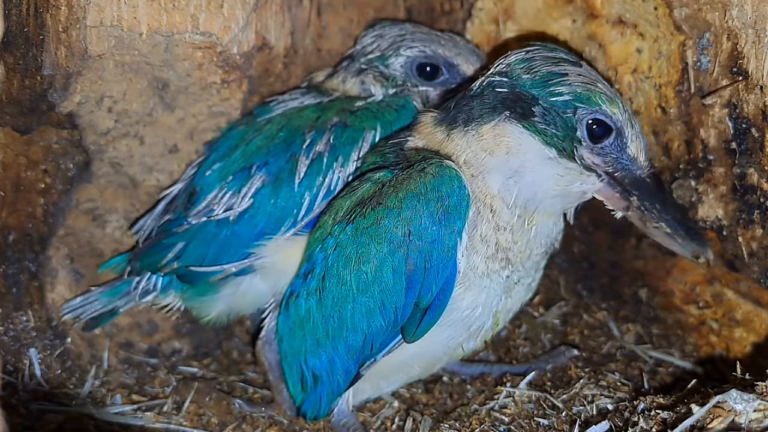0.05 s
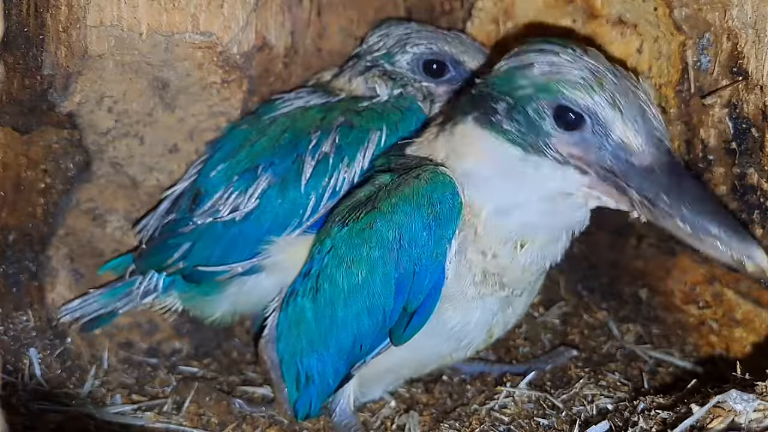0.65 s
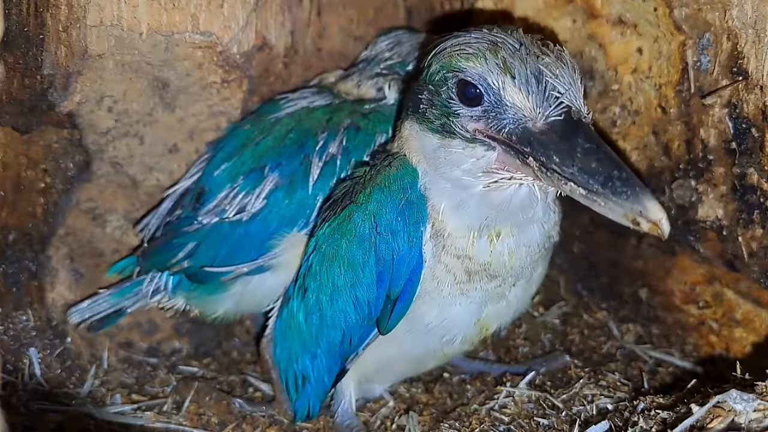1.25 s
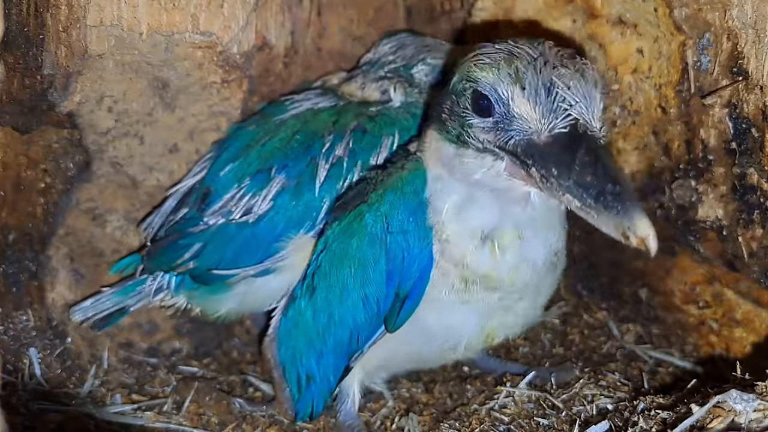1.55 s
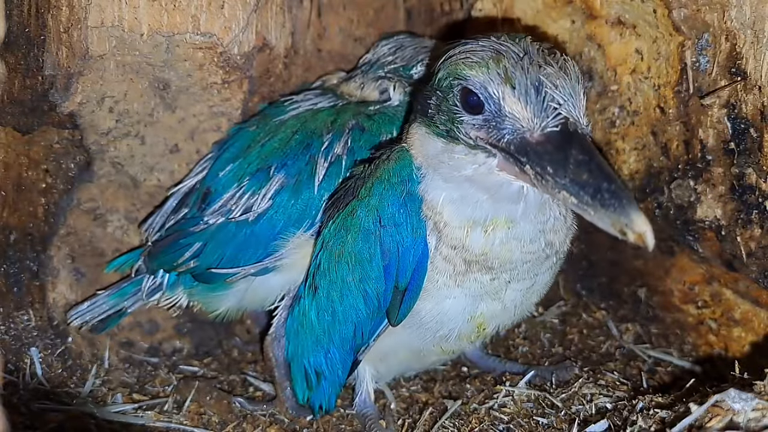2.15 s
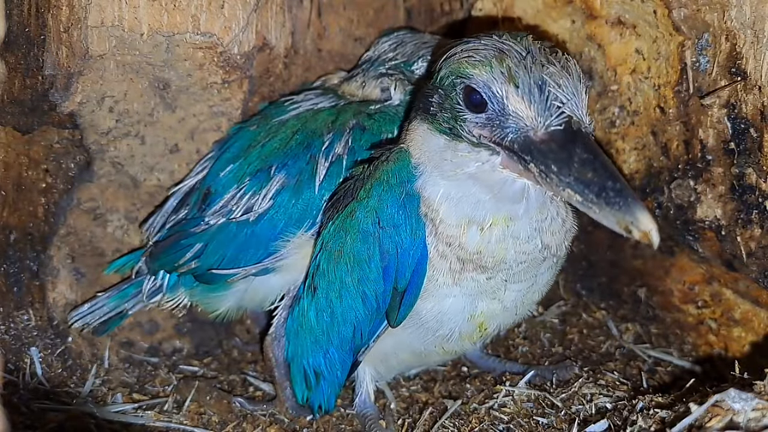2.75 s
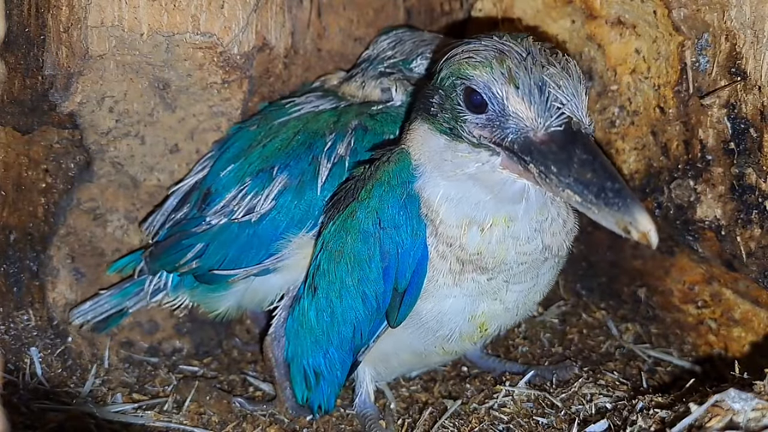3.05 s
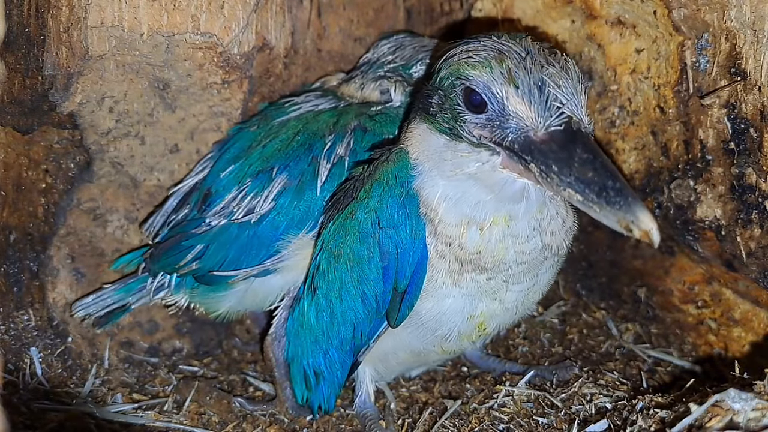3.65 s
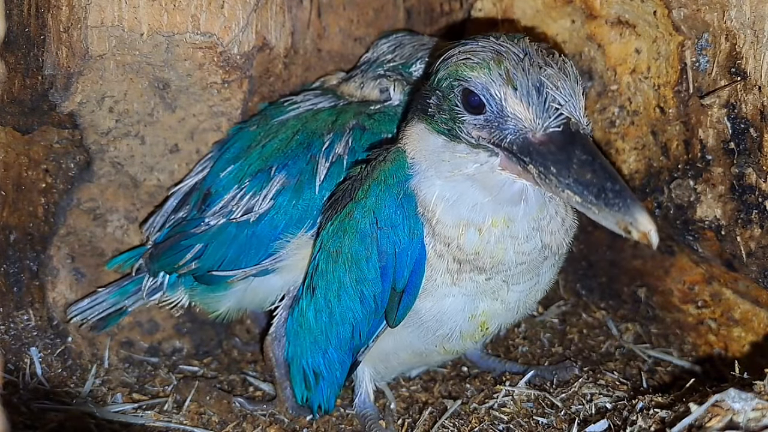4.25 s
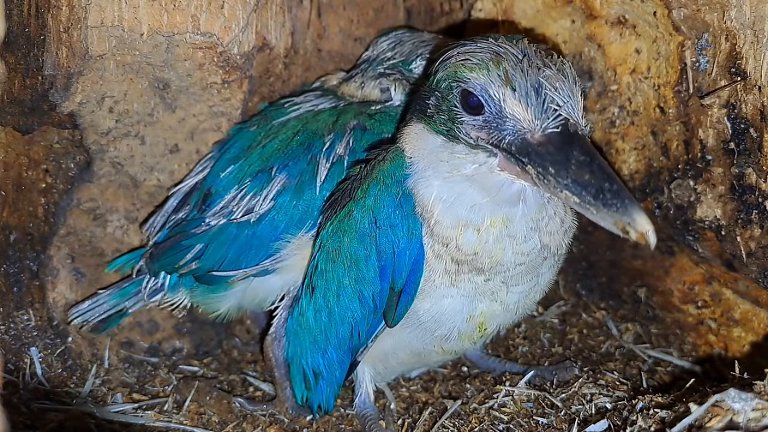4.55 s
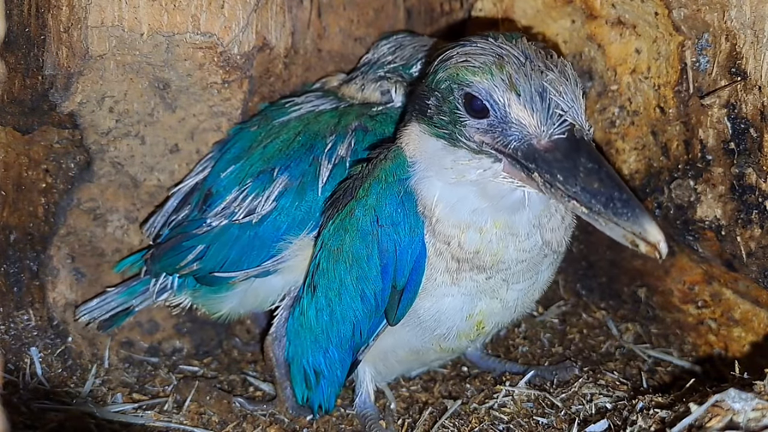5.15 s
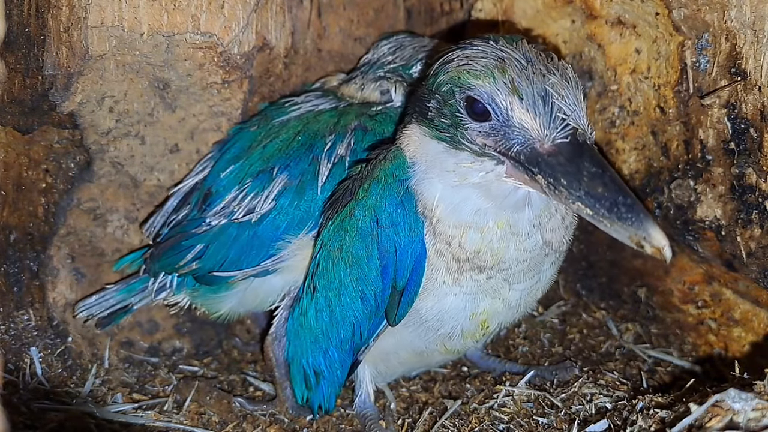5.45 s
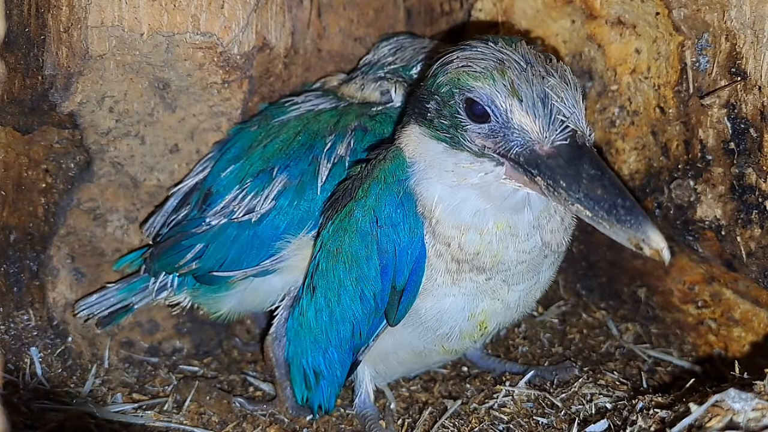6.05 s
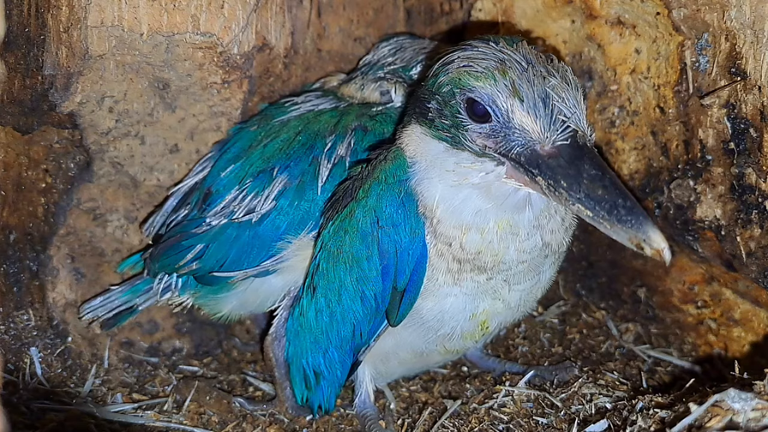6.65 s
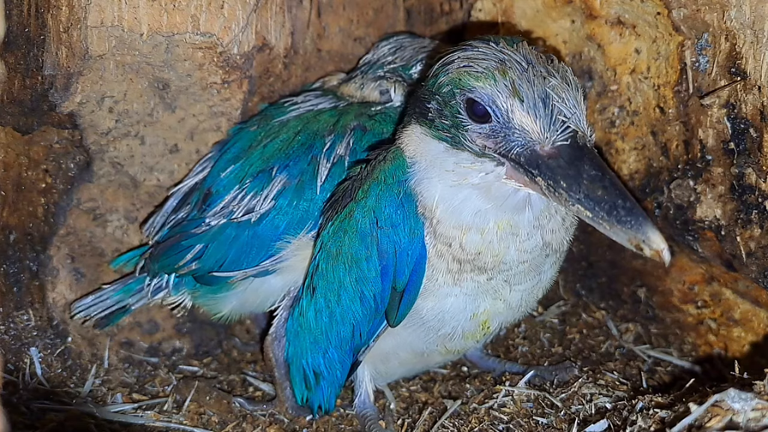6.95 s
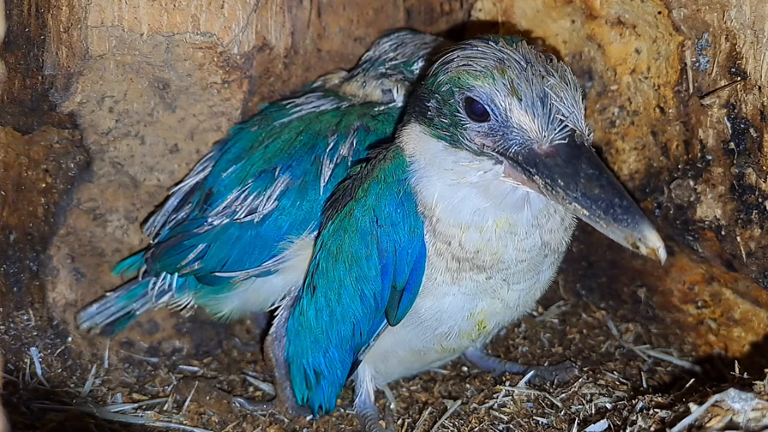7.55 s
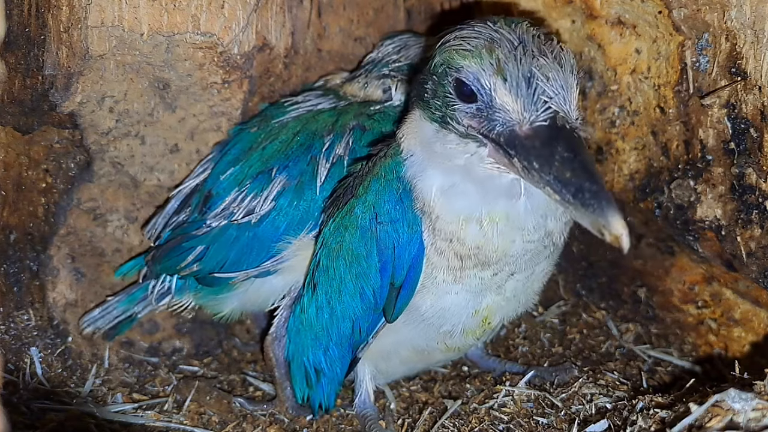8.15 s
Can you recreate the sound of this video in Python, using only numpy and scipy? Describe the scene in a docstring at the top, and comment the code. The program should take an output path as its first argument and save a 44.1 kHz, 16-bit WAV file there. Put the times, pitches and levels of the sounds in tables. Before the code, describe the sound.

A kingfisher chick begs up close in harsh, rasping screeches and rapid chips, over a low hum and faint distant birds.

```python
"""Kingfisher chicks begging in a nest hollow

Two chicks sit in a wooden hollow; the near one begs in harsh rasps. Its voice is one whistle near
1.7 kHz, modulated by the fluttering syrinx: separate chips at first, a hoarse screech as the bill
opens. Behind it are a low steady hum, faint far birds and a few ticks and rustles of nest litter."""
import sys
import numpy as np
from scipy import signal
from scipy.fft import rfft, irfft, next_fast_len
from scipy.io import wavfile
from scipy.ndimage import uniform_filter1d, minimum_filter1d

SR = 44100
rng = np.random.default_rng(int(sys.argv[2]) if len(sys.argv) > 2 else 0)


def inscribe(sig):
    """Save sig as 16-bit PCM at rate SR to the path in sys.argv[1].

    A 1-D sig is mono; a 2-D sig holds one channel per row.
    Samples are clipped to [-1, 1] before scaling.
    """
    pcm = np.round(np.clip(np.atleast_2d(sig).T, -1, 1) * 32767)
    wavfile.write(sys.argv[1], SR, pcm.astype(np.int16))


N = 371322
T = np.arange(N) / SR
FFT_SIZE = next_fast_len(N, True)
FREQS = np.arange(FFT_SIZE // 2 + 1) * SR / FFT_SIZE


def undb(db):
    """Amplitude ratio of a level in decibels."""
    return 10 ** (np.asarray(db) / 20)


def noise():
    """Gaussian white noise."""
    return rng.standard_normal(N)


def unit(x):
    """Normalisation to a standard deviation of 1."""
    return x / np.std(x)


def even(x, span_s=.024):
    """Automatic gain control: the running rms stays near 1, while faster flutter passes."""
    size = max(int(span_s * SR), 2)
    power = uniform_filter1d(uniform_filter1d(x * x, size), size // 2)
    return x / np.sqrt(np.abs(power) + 1e-9)


def filtered(x, gain):
    """Linear filtering: one gain multiplies each frequency."""
    return irfft(rfft(x, FFT_SIZE) * gain, FFT_SIZE)[:N]


def colour(x, points, power=1):
    """Spectral shaping by (Hz, dB) points joined on a log-frequency axis."""
    hz, db = np.transpose(points)
    return filtered(x, undb(power * np.interp(np.log(np.maximum(FREQS, 1)), np.log(hz), db)))


def band(x, hz, width_hz):
    """Gaussian band-pass filter."""
    return filtered(x, np.exp(-.5 * np.minimum(((FREQS - hz) / width_hz) ** 2, 100)))


def wander(hz, width_hz):
    """Band-limited noise around hz, with a standard deviation of 1."""
    return unit(band(noise(), hz, width_hz))


def phase_of(hz):
    """Phase as the time integral of frequency."""
    return 2 * np.pi * np.cumsum(hz) / SR


def gate(start, end, edge_s):
    """Trapezoidal envelope between two times."""
    return np.clip(np.minimum(T - start, end - T) / edge_s, 0, 1)


# Unbroken stretches of voice. Each row: start and end in seconds, level in dB, swell time in seconds.
SYLLABLES = [(0, 0.08, -12, 0.0013), (0.176, 0.225, -11, 0.014), (0.223, 0.244, -16.5, 0.0013),
             (0.248, 0.598, -11.5, 0.027), (1.675, 1.735, -25, 0.0023), (1.739, 1.847, -16.5, .055),
             (1.862, 1.951, -16, .025), (1.958, 2.017, -17.5, .008), (2.018, 2.352, -11, 0.068),
             (2.354, 2.376, -15, .002), (2.457, 2.541, -12.5, 0.014), (2.567, 2.879, -11, 0.012),
             (3.677, 3.71, -11, 0.022), (3.711, 3.775, -13.5, 0.0016), (3.779, 4.25, -12, 0.0348),
             (4.335, 4.551, -14.5, .022), (4.578, 4.656, -12.5, .009), (6.699, 6.783, -16, .02),
             (6.787, 6.933, -15, 0.0021), (6.95, 6.996, -15.5, .003), (7.019, 7.086, -14, 0.0022),
             (7.114, 7.416, -11.5, .002), (7.552, 7.671, -14, .02), (7.677, 7.719, -16, .005),
             (7.736, 7.796, -13.5, 0.013), (7.813, 8.06, -11.5, .014)]


def pressure(swell_db=7.5, release_db=4, release_s=.012):
    """Amplitude envelope in dB: each syllable swells, holds and sinks."""
    start, end, level_db, swell_s = np.transpose(SYLLABLES)
    k = np.searchsorted(start[1:], T)
    rising = np.clip(1 - (T - start[k]) / swell_s[k], 0, 1)
    sinking = np.clip(1 - (end[k] - T) / release_s, 0, 1)
    return level_db[k] - swell_db * rising - release_db * sinking


# Begging calls. Each row: start and end in seconds, nominal foot and crest pitch in Hz, crest time, rise
# and fall in seconds, then growl, first and last overtone and shut-bill rasp in dB against the whistle.
BEGS = [(0, 0.05, 1551, 1543, .05, 0.046, .03, -6, -28.5, -12, -40.5),
        (0.176, 0.59, 1559, 1742, .41, 0.098, 0.068, -8, -13.5, -8.5, -33.5),
        (1.679, 2.377, 1470, 1680, 2.09, 0.31, 0.22, -8.5, -20.5, -13, -28),
        (2.457, 2.878, 1554, 1749, 2.62, .07, .13, -9, -9.5, -4.5, -42.5),
        (3.678, 4.245, 1590, 1806, 3.96, 0.089, 0.099, -10, -21.5, -1, -39),
        (4.332, 4.649, 1543, 1682, 4.53, .07, .06, -10.5, -10, -8, -43.5),
        (6.699, 7.419, 1511, 1771, 7.15, .3, .2, -10, -42.5, -8.5, -34.5),
        (7.554, 8.066, 1521, 1816, 7.83, .13, .15, -9.5, -12, -4.5, -39)]


def begging():
    """Pitch contour and timbre: in each call the pitch arches once and the overtone setting rises."""
    hz, growl_db, overtone_db, rasp_db = np.zeros((4, N))
    under_way = np.searchsorted([row[0] for row in BEGS[1:]], T + .01)
    for k, (start, end, foot, crest, crest_s, rise, fall, growl, first, last, rasp) in enumerate(BEGS):
        now = under_way == k
        since = T[now] - crest_s
        hz[now] = foot + (crest - foot) * np.exp(-(since / np.where(since < 0, rise, fall)) ** 2)
        overtone_db[now] = np.interp(T[now], [start, end], [first, last])
        growl_db[now], rasp_db[now] = growl, rasp
    return hz, growl_db, overtone_db, rasp_db


# Bill openings. Each row: start and end in seconds, open-bill rasp and hiss in dB against the whistle.
GAPES = [(-.2, .075, -15.5, -6), (0.254, 0.602, -13, -38), (1.999, 2.384, -19.5, -27.5),
         (2.54, 2.879, -12.5, -34), (3.875, 4.264, -16, -38), (7.16, 7.429, -21.5, -37),
         (7.719, 8.075, -15, -42.5)]


def gape():
    """Aperture of the bill, one arch from 0 to 1 and back, with the rasp and hiss levels it reaches."""
    opening, rasp_db, hiss_db = np.zeros((3, N))
    for start, end, rasp, hiss in GAPES:
        now = (T > start) & (T < end)
        opening[now] = np.sin(np.pi * (T[now] - start) / (end - start)) ** 1.25
        rasp_db[now], hiss_db[now] = rasp, hiss
    return opening, rasp_db, hiss_db


# Stretches of purer whistle. Each row: start and end in seconds, change of the growl in dB.
CLEARINGS = [(2.51, 2.58, -24.5), (4.474, 4.62, -14), (6.919, 7.04, -4.5), (7.365, 7.438, -8.5),
             (7.695, 7.792, -2.5)]


def articulation(open_sag_db=-1.92, open_overtone_db=-18, shut_hiss_db=-43, wobble=.02, lift=.05):
    """Articulation: the opening bill trades overtone for rasp and hiss; a tight syrinx lifts the pitch."""
    hz, growl_db, overtone_db, rasp_db = begging()
    opening, wide_rasp_db, wide_hiss_db = gape()
    wide = np.minimum(opening / .68, 1)  # the rasp saturates before the bill is fully open
    tight = sum(np.exp(-np.abs(T - (start + end) / 2) / .025) for start, end, _ in SQUEAKS)
    level_db = pressure() + open_sag_db * wide
    hz *= 1 + lift * tight + wobble * wander(0, 24.97)
    growl_db += sum(db * gate(start, end, .02) for start, end, db in CLEARINGS)
    overtone_db += (open_overtone_db - overtone_db) * wide
    rasp_db += (wide_rasp_db - rasp_db) * wide
    hiss_db = shut_hiss_db + (wide_hiss_db - shut_hiss_db) * opening ** 1.3
    return level_db, hz, growl_db, overtone_db, rasp_db, hiss_db


def flutter(hoarse, chip_hz=114, screech_hz=200):
    """Irregular oscillation of syrinx tension: chips in twos and threes, faster and noisy when hoarse."""
    chips = np.sqrt(2) * np.sin(phase_of(chip_hz * (1 + .31 * wander(0, 45))))
    chips += .65 * even(wander(45, 25), .04)
    screech = wander(screech_hz, 137.8) + .56 * even(wander(40, 40), .033)
    return np.sqrt(1 - hoarse) * unit(chips) + np.sqrt(hoarse) * unit(screech)


# Spectrum of the growl. Each row: frequency in Hz, gain in dB.
GROWL_SPECTRUM = [(150, -11), (400, -12), (520, -13), (640, -0.5), (820, 3), (1050, 0), (1400, -13),
                  (2200, -43)]


def throat_growl(phase, breaking):
    """Period doubling: full flow breaks into a noisy subharmonic an octave below the whistle."""
    subharmonic = np.sin(phase / 2 + .7 * wander(0, 200))
    return colour(breaking * (subharmonic + .9 * wander(700, 450)), GROWL_SPECTRUM)


# Spectra of the overtone and of turbulence in the throat. Each row: frequency in Hz, gain in dB.
OVERTONE_SPECTRUM = [(1500, -26), (2100, 9.5), (2600, 3), (3150, -12), (3500, -2), (3850, -3.5),
                     (4300, -32), (6000, -57.5)]
TURBULENCE_SPECTRUM = [(1500, -21.5), (2100, 8.5), (2500, 5.5), (3150, -15.5), (3500, 1), (3900, -9),
                       (4400, -31.5), (6000, -42.5)]


def throat_overtone(phase, flow, breaking, hoarse, growl_db):
    """The second harmonic dissolves into turbulence as the growl takes over."""
    chaos = np.clip((growl_db + 16.5) / 12, .1, 1)
    octave = colour(flow * (1 - .58 * hoarse) * np.sin(2 * phase), OVERTONE_SPECTRUM)
    turbulence = colour(breaking * wander(3100, 1100), TURBULENCE_SPECTRUM)
    return octave + (.88 * chaos + .077 * hoarse) * turbulence


# Spectra of the rasp and the hiss. Each row: frequency in Hz, gain in dB.
RASP_SPECTRUM = [(2000, -22), (2600, -7), (3300, -5.5), (4200, -10.5), (4700, -6.5), (5200, 0),
                 (5600, -10.5), (6000, -21.5), (6700, -18.5), (8200, -28.5), (9500, -30), (11000, -45)]
HISS_SPECTRUM = [(4000, -41.5), (6000, -1), (8300, -13), (9800, 0), (11000, -5.5), (12500, -8),
                 (15500, -19.5)]


def chick():
    """Coupled frequency and amplitude modulation: tension lifts the pitch and chokes the airflow."""
    level_db, hz, growl_db, overtone_db, rasp_db, hiss_db = articulation()
    hoarse = np.clip((rasp_db + 29.5) / 16, .06, .95)  # the wider the bill, the harsher the voice
    effort = np.clip((level_db + 16.5) / 4, 0, 1.4)  # weak chips stand apart, strong ones run together
    # a syllable bursts open with a slack syrinx
    slack = np.clip(sum(np.exp(-((T - start - .004) / .004) ** 2) for start, *_ in SYLLABLES), 0, 1)
    tension = (1 - slack) * flutter(hoarse) - .6 * slack
    choke = 3.5 - 2.7 * hoarse
    flow = 1 / (1 + np.exp(choke * (tension + .5 - 1.05 * effort - .5 * hoarse))) + .04
    swing = (.12 + .065 * hoarse) * tension + (.022 + .04 * hoarse) * wander(0, 450)
    # weak chips sound only at the foot of each swing, so its centre lies above the heard pitch
    centre = .068 + .07 * np.maximum(1 - effort, -.2) * (1 - hoarse)
    phase = phase_of(hz * np.exp(centre + swing))
    breath = (.1 + .3 * hoarse) * flow * wander(1900, 650)
    whistle = even(flow * (np.sin(phase) + breath))
    breaking = flow / (1 + np.exp(1.4 * (tension + .5)))
    growl = undb(growl_db) * even(throat_growl(phase, breaking))
    overtone = undb(overtone_db) * even(throat_overtone(phase, flow, breaking, hoarse, growl_db))
    rasp = undb(rasp_db) * even(colour(flow * (.41 * np.sin(3 * phase) + noise()), RASP_SPECTRUM))
    hiss = undb(hiss_db) * even(colour((flow + .2 * hoarse) * noise(), HISS_SPECTRUM))
    envelope = undb(level_db) * sum(gate(start, end, .003) for start, end, *_ in SYLLABLES)
    return envelope * (whistle + growl + overtone + rasp + hiss) + squeaks(hz, tension, flow)


# Stereo colouring by the hollow. Each row: frequency in Hz, left minus right in dB, left lead in radians.
VOICE_BALANCE = [(400, 4.5, .35), (750, 1, .35), (1130, 9.5, 1.25), (1650, 12, 0), (2100, 9, 0),
                 (2570, 3.5, .3), (3100, 5.5, .2), (3500, -.5, .35), (4200, -3.5, -1.2), (4700, 4.5, 1),
                 (5400, -7, .3), (6500, 25, .7), (9500, 21, 1), (13000, 5.5, 1)]


def spread(x):
    """Level and phase differences share a sound between left and right, keeping their mean."""
    hz, db, lead = np.transpose(VOICE_BALANCE)
    ratio = undb(np.interp(FREQS, hz, db)) * np.exp(1j * np.interp(FREQS, hz, lead))
    left = filtered(x, 2 * ratio / (1 + ratio))
    return np.array([left, 2 * x - left])


def reverberate(x, t60_s, wet_db):
    """Diffuse reverberation: convolution with decaying noise adds a tail to each channel."""
    t = T[:SR // 2]
    tail = rng.standard_normal((2, len(t))) * undb(-60 * t / t60_s)
    tail /= np.sqrt(np.sum(tail ** 2, axis=1, keepdims=True))
    return x + undb(wet_db) * signal.fftconvolve(x, tail, axes=1)[:, :N]


# Spectrum of the hum. Each row: frequency in Hz, relative spectral density in dB.
HUM_SPECTRUM = [(11, -31), (21, -30.5), (32, -16.5), (43, 0.5), (54, -1), (75, -3.5), (90, -3),
                (120, -11.5), (170, -15.5), (235, -16.5), (300, -25), (400, -40.5), (600, -50.5),
                (1200, -110)]


def hum(rumble_db=-36.5, tone_hz=72, tone_db=-43, side_db=-13):
    """Low noise and a wavering tone, like a distant engine, highly correlated between the sides."""
    middle = unit(colour(noise(), HUM_SPECTRUM)) * undb(rumble_db + .21 * wander(0, .74))
    middle += undb(tone_db) * np.sqrt(2) * np.sin(phase_of(tone_hz * (1 + .0404 * wander(0, 8.5))))
    side = undb(rumble_db + side_db) * unit(colour(noise(), HUM_SPECTRUM))
    return np.array([1.07 * middle + side, .95 * middle - side])


# Spectrum of outdoor air. Each row: frequency in Hz, relative spectral density in dB.
AIR_SPECTRUM = [(250, -8), (450, 1), (850, 4), (1200, 0), (2500, -1), (4200, -2.5), (4900, .5),
                (5800, -10.5), (7000, -14), (8200, -13), (9500, -12.5), (12000, -8.5), (15500, -10)]
# Its stereo balance. Each row: frequency in Hz, left minus right in dB.
AIR_BALANCE = [(3000, 0), (5500, 8.5), (7500, 24), (9500, 14.5), (11500, -13), (15000, -3)]


def air(gain_db=-57):
    """Uncorrelated noise on the two sides gives a thin, wide hiss of air."""
    sides = [colour(unit(colour(noise(), AIR_SPECTRUM)), AIR_BALANCE, power) for power in (.5, -.5)]
    return undb(gain_db) * np.array(sides)


# Yelps at the edges of the calls. Each row: start and length in seconds, first and last pitch in Hz,
# level in dB, octave in dB against the fundamental.
YELPS = [(0.08, 0.015, 1722, 1247, -18.5, -14.5), (2.378, 0.0076, 1363, 1356, -18, -3.5),
         (2.878, 0.0057, 975, 814, -16, -9), (4.254, 0.0082, 1723, 1492, -15, -8),
         (4.263, 0.005, 1425, 1124, -20, -4.5), (4.652, 0.016, 1542, 770, -16.5, -2.5),
         (6.673, 0.0085, 1644, 956, -18, -25), (7.423, 0.01, 1380, 1278, -15, -4.5),
         (8.06, 0.014, 1456, 785, -18, -3.5)]


def yelps():
    """Downward glide: as the pressure runs out, the whistle drops, shaking, with its octave."""
    out, shake = np.zeros(N), wander(0, 370)
    for start, length, first, last, db, octave_db in YELPS:
        phase = phase_of(np.interp(T, [start, start + length], [first, last]) * (1 + .08 * shake))
        swell = np.sin(np.pi / 2 * gate(start, start + length, length / 3)) * undb(db - 2.5 * shake)
        out += swell * np.sqrt(2) * (np.sin(phase) + undb(octave_db) * np.sin(2 * phase))
    return out


# Small impacts. Each row: time in seconds, relative peak level in dB, centre frequency in Hz.
TICKS = [(0.121, -20, 813), (0.142, -25.5, 683), (0.956, -24, 3250), (1.417, -24, 2360), (1.432, -21, 2580),
         (1.48, -19.5, 2780), (2.404, -24.5, 695), (2.897, -32, 851), (3.019, -34, 850),
         (4.279, -15.5, 657), (8.09, -22.5, 640)]


def ticks(decay_s=.0013, gain_db=-9):
    """Heavily damped impacts of bill, feet and wood litter, each a short burst of band-passed noise."""
    out = np.zeros(N)
    for start, db, hz in TICKS:
        burst = noise() * (T > start) * np.exp(-np.abs(T - start) / decay_s)
        knock = band(burst, hz, .45 * hz)
        out += undb(db + gain_db) * knock / np.abs(knock).max()
    return out


# The chick shifts in the litter. Each row: start and end in seconds, level in dB.
SHUFFLES = [(0.603, 1.13, -57.5), (1.151, 1.718, -53)]
# Spectrum of the litter. Each row: frequency in Hz, gain in dB.
LITTER_SPECTRUM = [(200, 1), (300, 5), (450, -8.5), (700, 3), (1100, -9.5), (2500, -5.5), (4000, -11.5),
                   (5500, -18), (8000, -22.5), (12000, -22)]


def shuffles(grain_db=4):
    """Friction noise: feathers and feet rustle unevenly through dry wood chips."""
    level = sum(undb(db) * gate(start, end, .035) for start, end, db in SHUFFLES)
    grains = noise() * undb(grain_db * wander(0, 60))
    return level * unit(colour(grains, LITTER_SPECTRUM))


# Far whistles and coos. Each row: start and end in seconds, first, middle and last pitch in Hz,
# level in dB, hoarseness as a fraction of the pitch.
FAR_CALLS = [(0.692, 0.782, 2980, 3190, 4100, -51, 0.045), (0.723, 0.876, 1800, 2135, 1710, -49.5, 0.022),
             (0.643, 0.872, 4450, 4561, 4300, -60, 0.049), (0.865, 0.984, 3140, 3090, 3400, -45, 0.0516),
             (0.867, 0.972, 1750, 1680, 1610, -50, 0.069), (0.965, 1.105, 3050, 3430, 3680, -53.5, 0.0558),
             (1.17, 1.357, 2700, 2900, 2900, -51, 0.087), (1.373, 1.57, 2227, 2907, 2907, -39, 0.1),
             (2.901, 3.424, 850, 850, 854, -59.5, 0.021), (3.35, 3.55, 3474, 3684, 3894, -63.5, 0.025),
             (5.287, 5.779, 845, 830.7, 830, -56, 0.054), (5.766, 6.12, 1114, 1160, 1150, -62, 0.035)]
# Far trills. Each row: start and end in seconds, centre frequency in Hz, level in dB.
FAR_TRILLS = [(.9, 1.6, 4750, -70), (2.9, 3.3, 4750, -69), (3.38, 3.7, 4500, -69), (4.7, 5.1, 4520, -69),
              (5.18, 5.92, 4650, -61.5), (5.98, 6.44, 4680, -59.5), (8.02, 8.28, 4680, -60.5)]


def far_birds(trill_hz=24):
    """Scattering by trees blurs gliding calls and thin trills of pulsing narrow-band noise."""
    calls, waver = np.zeros(N), wander(0, 200)
    for start, end, first, middle, last, db, rough in FAR_CALLS:
        hz = np.interp(T, [start, (start + end) / 2, end], [first, middle, last])
        envelope = undb(db) * gate(start, end, (end - start) / 3)
        calls += envelope * np.sin(phase_of(hz * (1 + rough * waver)))
    throb = 1 + .55 * np.sin(phase_of(trill_hz * (1 + .08 * wander(0, 4))))
    trills = sum(undb(db) * gate(start, end, .12) * wander(hz, 150) for start, end, hz, db in FAR_TRILLS)
    return reverberate(np.array([calls + throb * trills] * 2), t60_s=.5, wet_db=-4)


# Squeaks between some syllables. Each row: start and end in seconds, gain in dB.
SQUEAKS = [(2.537, 2.592, -28.5), (4.549, 4.576, -28.5), (6.94, 6.949, -14.5), (7.718, 7.743, -32)]


def squeaks(hz, tension, flow):
    """Tension raises frequency: the tightened syrinx carries the voice on as a thin, higher tone."""
    envelope = sum(undb(db) * gate(start, end, .012) for start, end, db in SQUEAKS)
    tone = np.sqrt(2) * np.sin(phase_of(hz * (1.2 + .17 * tension)))
    return envelope * tone * (flow + .26)


def scene():
    """Superposition of the chick, ringing in its hollow, and the world outside."""
    near = spread(chick() + yelps()) + ticks() + shuffles()
    return reverberate(near, t60_s=.13, wet_db=-19.5) + far_birds() + hum() + air()


def record(dry):
    """Peak limiting holds the loudest chips near full scale; their tips clip and the top is cut."""
    window, ceiling, top_hz = SR // 250, 1.09, 15700
    gain = 1 / np.maximum(np.abs(dry).max(axis=0) / ceiling, 1)
    gain = uniform_filter1d(minimum_filter1d(gain, window), window)
    low_pass = signal.ellip(12, .2, 60, top_hz, fs=SR, output="sos")
    return signal.sosfilt(low_pass, np.clip(dry * gain, -1, 1))


dry = scene()
out = record(dry)
inscribe(out)
```